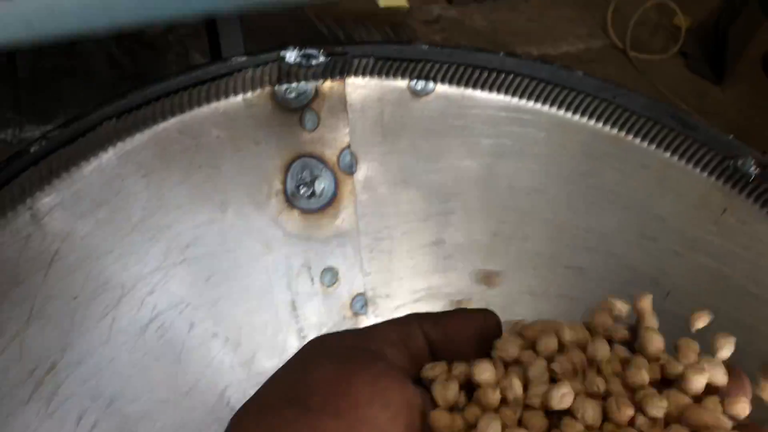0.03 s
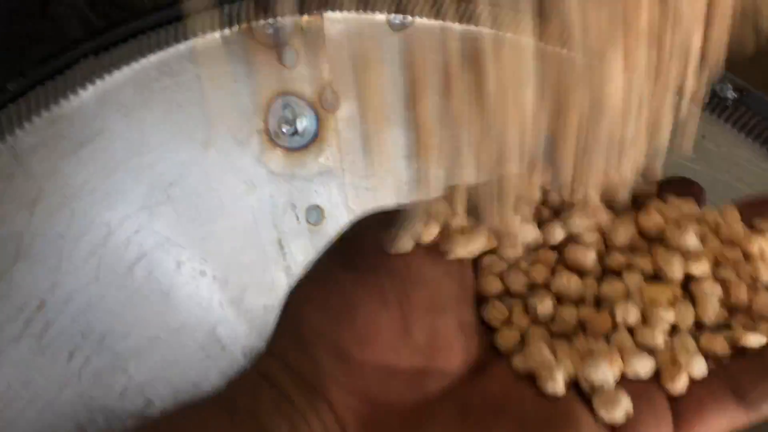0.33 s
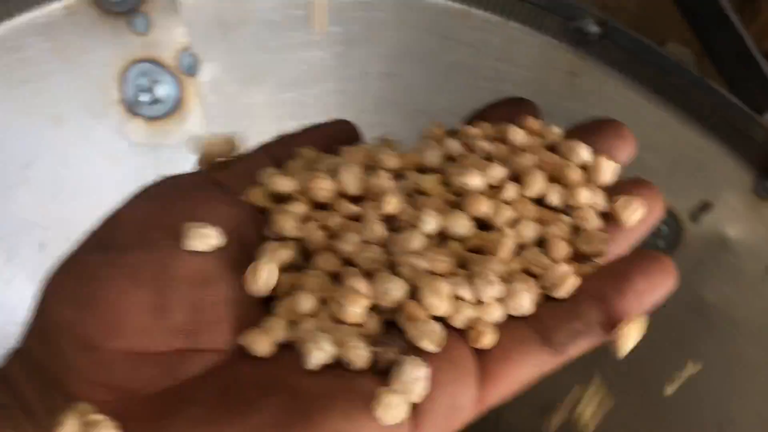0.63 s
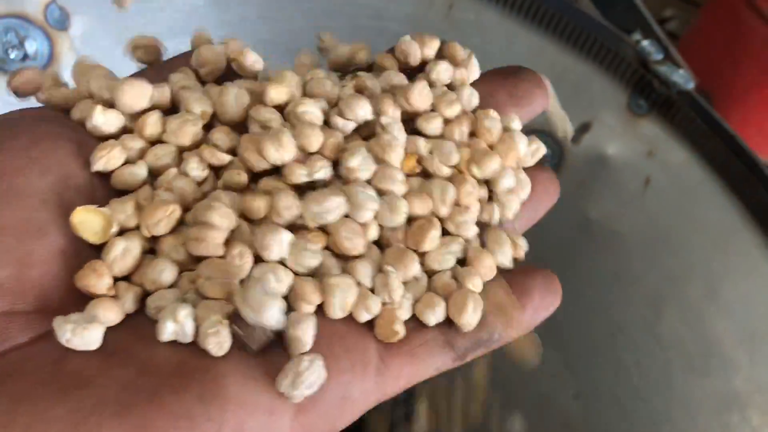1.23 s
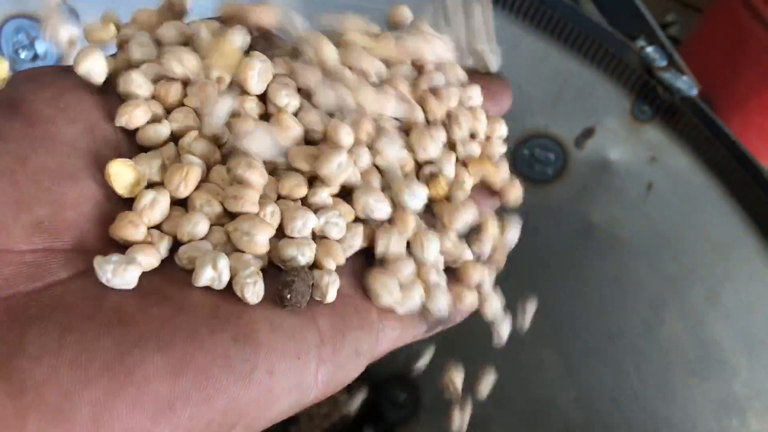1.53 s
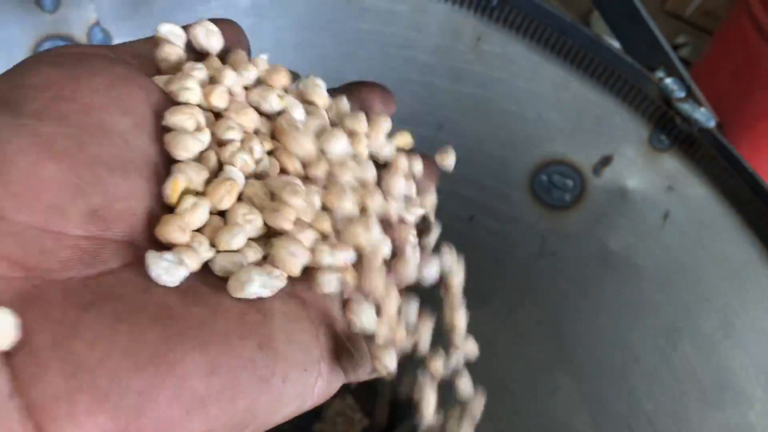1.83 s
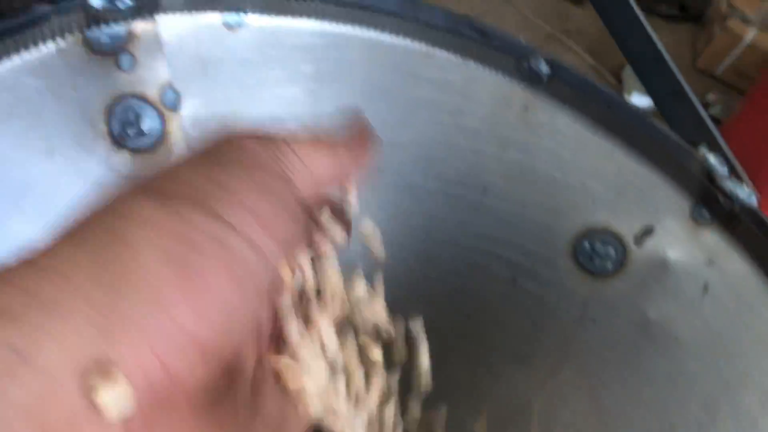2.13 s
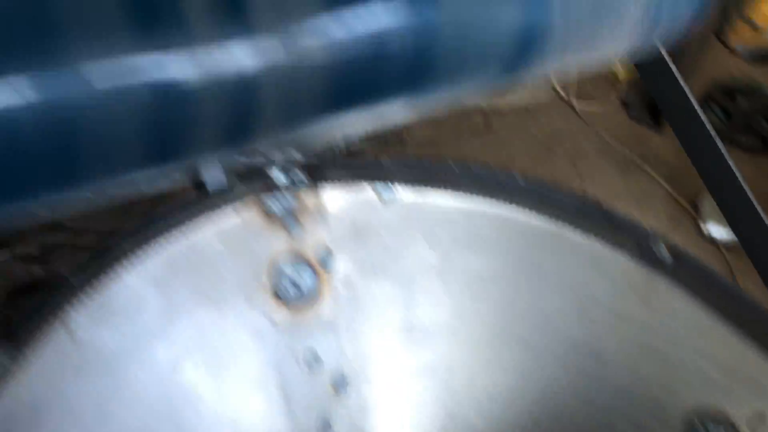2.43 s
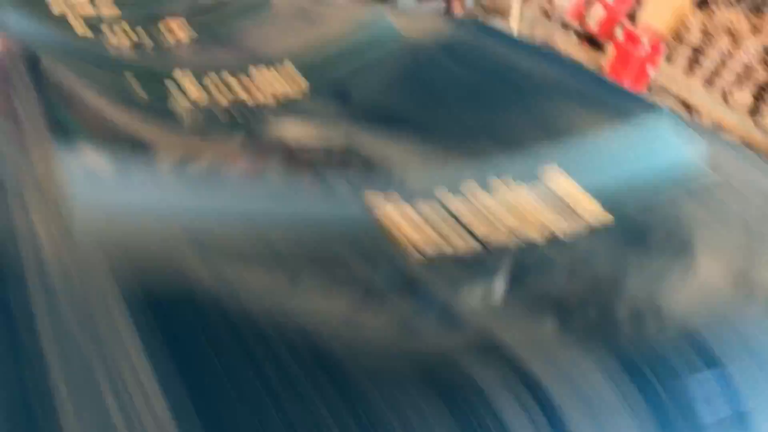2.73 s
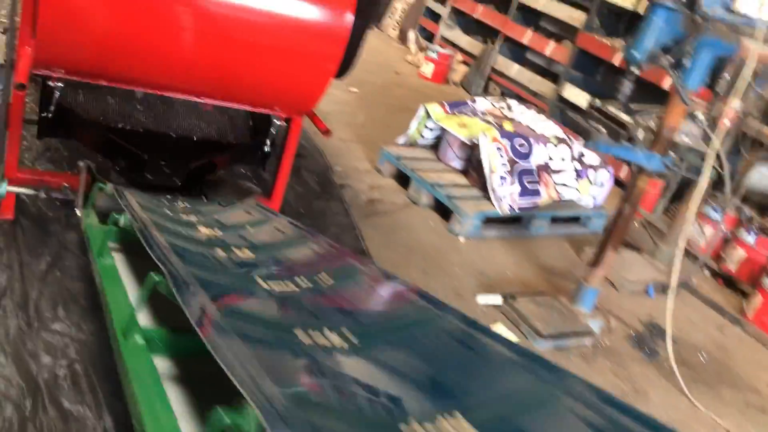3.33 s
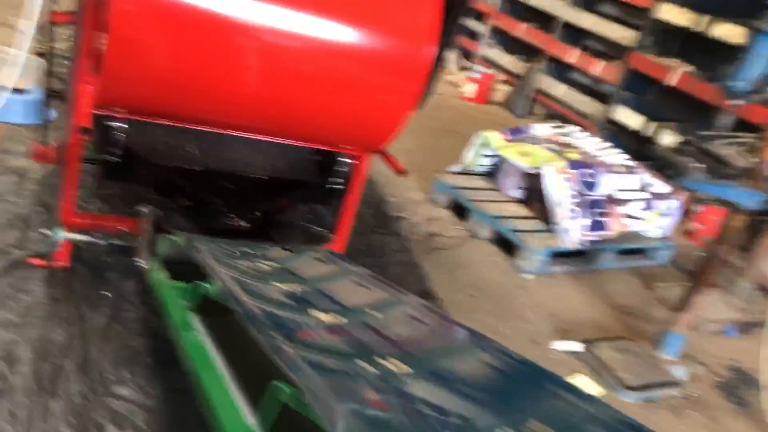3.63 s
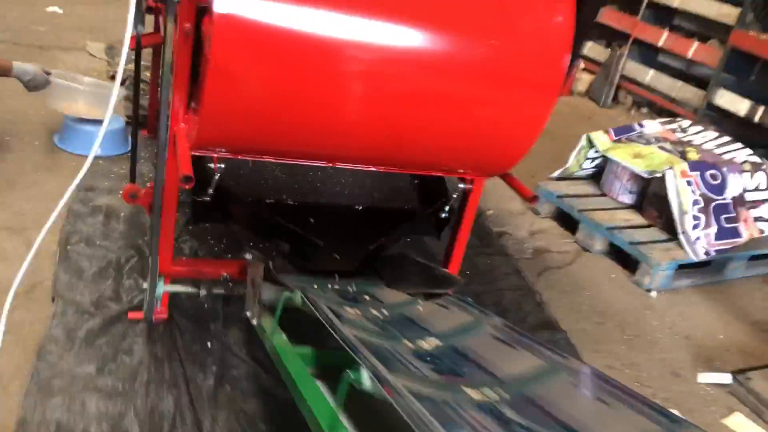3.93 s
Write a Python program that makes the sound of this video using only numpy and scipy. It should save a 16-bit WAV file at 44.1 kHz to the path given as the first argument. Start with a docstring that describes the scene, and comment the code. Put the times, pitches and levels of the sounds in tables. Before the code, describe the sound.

In a workshop, dried chickpeas rattle and patter on a steel cone in quick surges, heard close up with small ticks and pings. Later the rattle turns distant and sparse, with dull bucket knocks and a rising motor hum.

```python
"""A workshop, microphone close to a steel hopper that a bucket elevator feeds with dried chickpeas.
About every 0.39 s a load lands in a bright splash, then rattles down the cone; small clusters tick
and ring the sheet. Late on, the microphone turns away along the conveyor: the peas recede, the
buckets knock as they tip and a throbbing motor comes nearer. The room answers peas and buckets."""
import sys
import numpy as np
from scipy import signal
from scipy.fft import rfft, irfft, next_fast_len
from scipy.io import wavfile
from scipy.ndimage import map_coordinates

SR = 44100
rng = np.random.default_rng(int(sys.argv[2]) if len(sys.argv) > 2 else 0)


def wav_record(signal):
    """Record a signal, one row per channel, as 16-bit PCM in the file named by sys.argv[1]."""
    frames = np.transpose(np.atleast_2d(signal))
    bounded = np.clip(frames, -1, 1)
    # unit amplitude maps onto the largest positive 16-bit level
    quanta = np.round(bounded * 32767).astype(np.int16)
    wavfile.write(sys.argv[1], SR, quanta)


N = 176400

# peas streaming down the cone, close up (time [s], rattle level [dB], patter level [dB])
STREAM_NEAR = [(0.0, -24, -21.5), (0.08, -26.5, -28), (0.16, -38, -44), (0.2, -23, -22), (0.35, -21, -17.5),
               (0.51, -31.5, -30), (0.56, -28, -25.5), (0.6, -22.5, -19.5), (0.77, -21, -17),
               (0.86, -26, -26), (0.91, -27.5, -19), (0.94, -34, -31), (1.0, -23, -18), (1.24, -24.5, -22),
               (1.3, -30, -28.5), (1.36, -34.5, -32), (1.38, -24, -21.5), (1.55, -24.5, -21),
               (1.61, -31.5, -32), (1.64, -28.5, -22), (1.73, -27.5, -25), (1.78, -22, -19.5),
               (1.95, -22, -16.5), (2.35, -24, -18.5), (2.39, -32.5, -28), (2.45, -28, -23.5),
               (2.5, -37, -29.5)]
# the last peas, from further off (time [s], rattle level [dB], patter level [dB])
STREAM_FAR = [(2.54, -20, -21), (2.61, -30.5, -28), (2.68, -36, -29.5), (2.76, -40, -52), (2.895, -49, -61),
              (2.937, -21.5, -35), (2.98, -38.5, -38), (3.1, -44, -35.5), (3.27, -58, -58),
              (3.31, -30, -35), (3.42, -43, -40.5), (3.66, -55, -42), (3.72, -32.5, -31.5), (4, -52.5, -45)]
# the stream's low rattle (frequency [Hz], level [dB])
RATTLE_SPECTRUM = [(300, -46), (900, -25.5), (1300, -15), (1700, -4), (3000, 1), (4200, 0), (5500, -3),
                   (9000, -10)]
# the stream's bright patter (frequency [Hz], level [dB])
PATTER_SPECTRUM = [(500, -47), (1500, -15), (3000, -15), (5000, -5.5), (6500, 0), (9000, 0.5), (13000, 0),
                   (13800, 2), (16000, 2)]
# the hopper's clearest modes (frequency [Hz], relative level [dB])
HOPPER_MODES = [(1060, -13.5), (1125, -20), (1790, -12), (2136, -4.5), (2600, -2), (2700, -3.5), (3030, -4),
                (3408, -7.5), (4200, -0.5), (5565, 0.5), (5728, 0.5), (6558, 3), (7290, 2), (10095, 1),
                (11030, 0)]
# the motor as the microphone nears it (time [s], rumble level [dB], hum gain [dB])
MOTOR_APPROACH = [(0, -42.5, -1), (2.8, -43, 0), (3.25, -41, 4), (3.65, -39.5, 4.5), (4, -38, 6)]
# the motor's rumble (frequency [Hz], level [dB])
RUMBLE_SPECTRUM = [(42, -23), (60, -3), (78, -5.5), (115, 4.5), (150, -1), (280, -2), (600, -5.5),
                   (4000, -10.5), (15000, -19)]
# tones one, two and three throb rates above the hum (level against the hum [dB])
THROB_TONES = [-7, -8.5, -16]
# the workshop's reverberation (frequency [Hz], t60 [s])
ROOM_DECAY = [(200, 1), (2500, 0.51), (8000, 0.41), (15000, 0.34)]
# small clusters of peas striking the steel (time [s], relative level [dB])
CLUSTER_STRIKES = [(.028, -6.5), (.046, -6), (.06, -5), (.081, -3.5), (0.186, -2), (.252, -2.5), (.279, -7),
                   (0.323, -9), (.448, -9), (.482, -7), (.516, -11), (0.55, -8), (.591, -2), (0.658, -11),
                   (0.782, -4), (0.826, -8), (0.883, -5.5), (.947, -7), (.966, -4), (1.0, -3), (1.088, -8),
                   (1.126, -6), (1.142, -6), (1.212, -6.5), (1.237, 0), (1.272, -2.5), (1.305, -13),
                   (1.326, -7), (1.3632, -5.5), (1.399, -2), (1.4418, -8), (1.4645, -4.5), (1.51, 0),
                   (1.5424, -1), (1.591, -2), (1.6195, -3), (1.653, -8), (1.6904, -0.5), (1.7472, -3),
                   (1.9534, -6), (2.079, -12), (2.169, -2), (2.2473, -3), (2.396, -2.5), (2.439, -5),
                   (2.612, -12), (2.628, -5.5), (2.665, -9.5), (2.6957, -11.5), (2.734, -13.5),
                   (2.799, -18.5), (2.8505, -15), (2.9058, -2), (2.971, -7), (2.9874, -12), (3.006, -13),
                   (3.0215, -10), (3.05, -19), (3.145, -17), (3.288, -7), (3.694, -12)]
# the tick of one cluster (frequency [Hz], level [dB])
TICK_SPECTRUM = [(500, -25), (3000, -9.5), (6000, -1), (12500, 0.5), (14500, 3.5)]
# loads landing (time [s], level [dB], rise [s], t60 [s])
LANDINGS = [(0.17, -21.5, 0.0012, 0.092), (.567, -20, .014, .2), (.975, -19.5, 0.0068, 0.32),
            (1.364, -15.5, .001, 0.14), (1.7345, -15.5, .003, .24), (2.132, -25, .003, 0.089),
            (2.515, -14, 0.0049, 0.18), (2.9056, -13, 0.00073, 0.18), (2.937, -23, .0034, .15),
            (3.2873, -19.5, 0.0036, 0.15), (3.68, -20, .019, 0.15)]
# a load's splash (frequency [Hz], level [dB])
SPLASH_SPECTRUM = [(400, -60), (1200, -33), (2000, -2.5), (4000, -1), (8000, 0), (12500, -1), (14500, 7),
                   (16000, -4)]
# glancing peas (time [s], frequency [Hz], level [dB], t60 [s])
GLANCES = [(1.271, 6520, -19, .06), (1.591, 6600, -20, 0.063), (1.624, 8500, -23, 0.15),
           (1.907, 2866, -17.5, .1), (1.947, 2990, -18.5, .12), (1.958, 6580, -21, .09),
           (2.439, 5600, -21.5, 0.21), (2.696, 9220, -17.5, .037), (2.62, 5510, -41, 1.8),
           (2.98, 1815, -34, .14)]
# buckets tipping (time [s], level [dB])
BUCKET_TIPS = [(2.898, -32.5), (3.284, -26), (3.669, -28)]
# a bucket's dull knock (frequency [Hz], level [dB])
KNOCK_SPECTRUM = [(80, -19), (250, 2.5), (550, 0), (1150, -4), (2200, -21), (6000, -38)]

TOP_HZ = 15800  # top of the sheet's modes and of the microphone's band


def amp(db):
    """Decibels to gain."""
    return 10 ** (np.asarray(db) / 20)


def unit(x):
    """Scale to rms 1."""
    return x / np.sqrt(np.mean(x ** 2) + 1e-20)


def along(points, hz):
    """Interpolate (frequency [Hz], value) points on a log frequency axis."""
    knots_hz, values = np.transpose(points)
    return np.interp(np.log(hz + 1), np.log(knots_hz + 1), values)


def curves(rows):
    """One value per sample for each column after the time."""
    times, *columns = np.transpose(rows)
    return [np.interp(np.arange(N) / SR, times, column) for column in columns]


def wobble(rate):
    """A smooth random curve, rate knots a second."""
    return map_coordinates(rng.standard_normal(512), [np.arange(N) * rate / SR], mode="wrap")


def filtered(x, response):
    """Filter x by a gain given as a function of frequency."""
    n = x.shape[-1]
    padded = next_fast_len(n + 4096)
    return irfft(rfft(x, padded) * response(np.fft.rfftfreq(padded, 1 / SR)), padded)[..., :n]


def coloured(x, spectrum):
    """Shape x by a (frequency [Hz], level [dB]) spectrum, at rms 1."""
    return unit(filtered(x, lambda hz: amp(along(spectrum, hz))))


def sheet(spectrum, t60, crack_db, spots, hold_s=0, uneven_db=0, modes=420):
    """Steel struck at several spots: each gives a contact crack and the same modes in its own mix."""
    t = np.arange(SR // 8) / SR
    hz = (np.arange(modes) + rng.random(modes)) * TOP_HZ / modes
    shares = rng.standard_normal((spots, modes)) * amp(uneven_db * rng.standard_normal((spots, modes)))
    shares /= np.linalg.norm(shares, axis=1, keepdims=True)
    tones = np.sin(2 * np.pi * (hz[:, None] * t + rng.random((modes, 1))))
    ring = unit(shares @ tones) * amp(-60 * np.maximum(t - hold_s, 0) / t60)
    crack = amp(crack_db - 60 * t / 0.0026) * rng.standard_normal(ring.shape)
    low_cut = signal.butter(2, 250, "high", fs=SR, output="sos")
    hits = signal.sosfilt(low_cut, coloured(ring + crack, spectrum))
    return hits / np.sqrt(np.mean(hits[:, :SR // 200] ** 2))  # rms 1 over the first 5 ms


def impacts(rate, scatter_db, spots=8, peas=8000):
    """Irregular pea impacts, rate a second, dealt into one impulse train per spot."""
    delay, strength, place = rng.random((peas, 3)).T
    at = ((np.arange(peas) + 2 * delay) * SR / rate).astype(int)
    force = amp(scatter_db * (2 * strength - 1))
    trains, heard = np.zeros((spots, N)), at < N
    trains[(place[heard] * spots).astype(int), at[heard]] = force[heard]
    return trains


def shower(trains, spectrum, t60, crack_db):
    """Each train of impacts rings its own spot of the sheet; the sum is at rms 1."""
    hits = sheet(spectrum, t60, crack_db, spots=len(trains))
    return unit(signal.oaconvolve(trains, hits, axes=1)[:, :N].sum(0))


def stream():
    """Peas rattle and patter down the cone and ring it, first close up, then further off."""
    rattle_db, patter_db = curves(list(STREAM_NEAR) + list(STREAM_FAR))
    rattle = shower(impacts(rate=350, scatter_db=6), RATTLE_SPECTRUM, t60=0.08, crack_db=4.5)
    patter = shower(impacts(rate=210, scatter_db=2.5, spots=20), PATTER_SPECTRUM, t60=0.073, crack_db=-23)
    return amp(rattle_db - 0.5) * rattle + amp(patter_db - 1.5) * patter + hopper(rattle_db, patter_db)


def hopper(rattle_db, patter_db, t60=0.16, max_split_hz=39.4, bright_above_hz=5000):
    """The stream keeps the clearest modes ringing; the cone is not quite round, so each is a pair."""
    t = np.arange(N) / SR
    age = t[:SR // 2]
    bare_db = 10 * np.exp(-((t - 2.39) / 0.11) ** 2)  # peas fall on bare steel: it rings more
    bright_db = patter_db + bare_db - 8
    trains = impacts(rate=1500, scatter_db=2, spots=len(HOPPER_MODES))
    out = np.zeros(N)
    for (hz, db), blows in zip(HOPPER_MODES, trains):
        twin_hz = hz + max_split_hz * rng.uniform(0.55, 1) * rng.choice([-1, 1])
        pair = np.sin(2 * np.pi * hz * age) + np.sin(2 * np.pi * twin_hz * age)
        ring = amp(-60 * age / t60) * pair
        drive_db = bright_db if hz > bright_above_hz else rattle_db
        force = amp(db + drive_db - 13.5) * unit(blows)
        out += signal.fftconvolve(force, ring / np.linalg.norm(ring))[:N]
    return out


def motor(hum_hz=100, throb_hz=5.0, dip_at_s=0.178):
    """Rumble and a hum that dips once a turn of the drive, louder as the microphone comes near."""
    t = np.arange(N) / SR - dip_at_s
    rumble_db, nearer_db = curves(MOTOR_APPROACH)
    phase = 2 * np.pi * (hum_hz * t + rng.random()) + 0.1 * wobble(3.74)
    throb = sum(amp(db + 1.3 * wobble(4.7)) * np.sin(phase + 2 * np.pi * k * throb_hz * t)
                for k, db in enumerate(THROB_TONES, 1))
    hum = amp(nearer_db) * (np.sin(phase) - throb)
    octaves = np.sin(2 * phase) + amp(-7) * np.sin(4 * phase)
    hum += amp(-13 + 2.2 * nearer_db) * octaves  # the hum brightens at closer range
    rumble = amp(rumble_db) * coloured(rng.standard_normal(N), RUMBLE_SPECTRUM)
    return amp(-48) * np.sqrt(2) * hum + rumble


def workshop(direct):
    """The room's tail reaches the microphone 5 ms late and dies sooner in the treble."""
    hz, t, noise = signal.stft(rng.standard_normal(SR // 2), SR, nperseg=256)
    decay = amp(-60 * t / along(ROOM_DECAY, hz)[:, None])
    tail = signal.istft(noise * decay, SR, nperseg=256)[1]
    delayed = np.pad(direct, (SR // 200, 0))
    return signal.fftconvolve(delayed, tail / np.linalg.norm(tail))[:N]


def clusters():
    """Small clusters of peas tick on the steel; each tick holds about 7 ms, then dies away."""
    out = np.zeros(N + SR)
    ticks = sheet(TICK_SPECTRUM, t60=0.05, crack_db=1, spots=len(CLUSTER_STRIKES),
                  hold_s=0.0072, uneven_db=4)
    for (start, db), tick in zip(CLUSTER_STRIKES, ticks):
        out[round(start * SR):][:len(tick)] += amp(db - 16) * tick
    return out[:N]


def loads():
    """The front of each load lands at once, in a dense splash."""
    t = np.arange(N) / SR
    level = np.zeros(N)
    for start, db, rise, t60 in LANDINGS:
        attack = np.clip((t - start) / rise, 0, 1)
        level += attack * amp(db - 60 * np.maximum(t - start - rise, 0) / t60)
    trains = impacts(rate=900, scatter_db=6, spots=12)
    return level * shower(trains, SPLASH_SPECTRUM, t60=0.15, crack_db=16)


def pings():
    """A glancing pea sets one mode of the sheet singing, for a third of a second at most."""
    out, t = np.zeros(N + SR), np.arange(SR // 3) / SR
    for start, hz, db, t60 in GLANCES:
        out[round(start * SR):][:len(t)] += amp(db - 60 * t / t60) * np.sin(2 * np.pi * hz * t)
    return out[:N]


def buckets(t60=0.051):
    """Along the conveyor, a tipping bucket knocks dully just before its load lands."""
    t = np.arange(N) / SR
    level = sum((t > start) * amp(db - 60 * abs(t - start) / t60) for start, db in BUCKET_TIPS)
    return level * coloured(rng.standard_normal(N), KNOCK_SPECTRUM)


def scene():
    """Peas and buckets with the room behind them, over the motor, on one microphone."""
    direct = stream() + loads() + clusters() + pings() + buckets()
    return (direct + amp(-11.5) * workshop(direct) + motor())[None]


def record(dry):
    """The microphone's band ends in a 200 Hz wide slope."""
    return filtered(dry, lambda hz: np.clip((TOP_HZ - hz) / 200 + 0.5, 0, 1))


dry = scene()
out = record(dry)
wav_record(out)
```